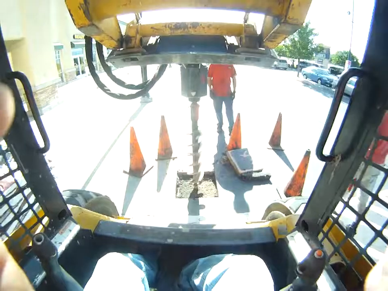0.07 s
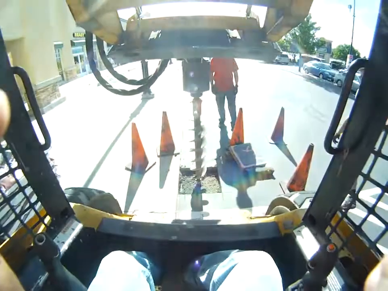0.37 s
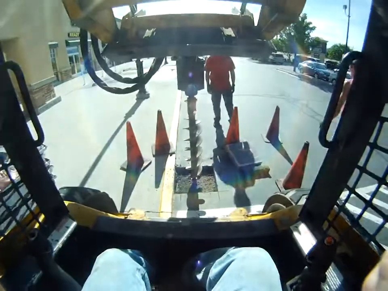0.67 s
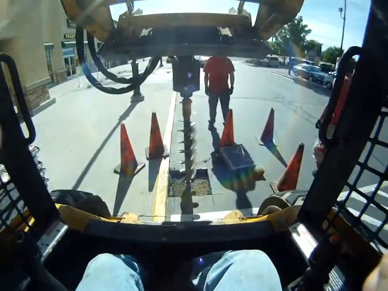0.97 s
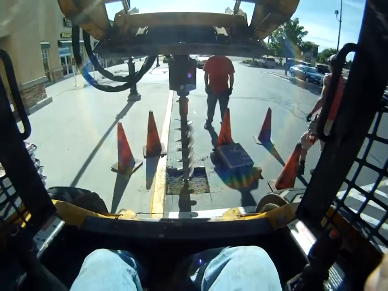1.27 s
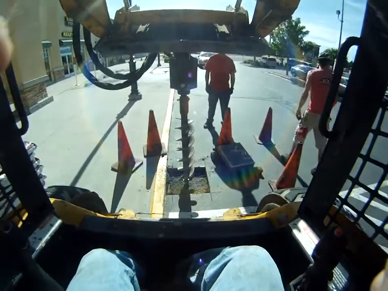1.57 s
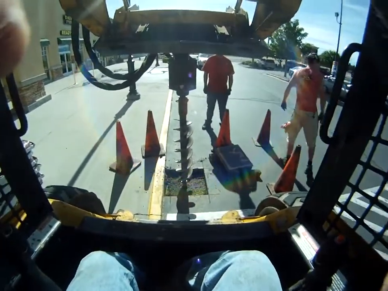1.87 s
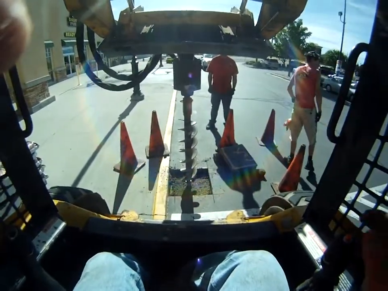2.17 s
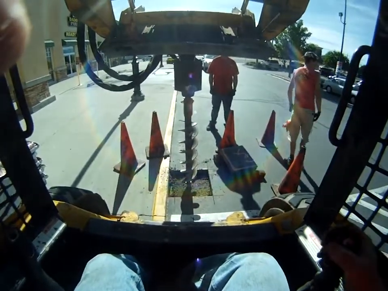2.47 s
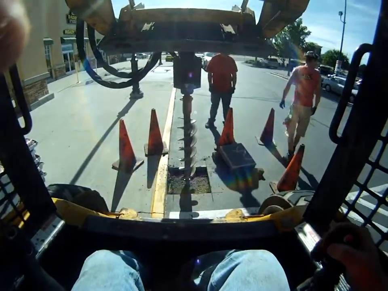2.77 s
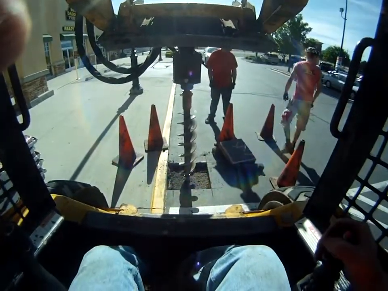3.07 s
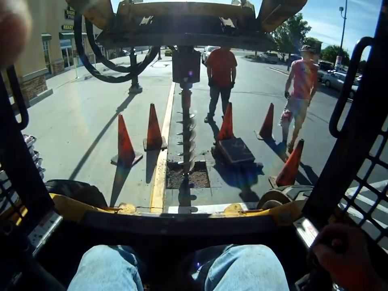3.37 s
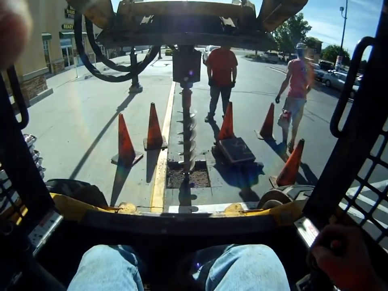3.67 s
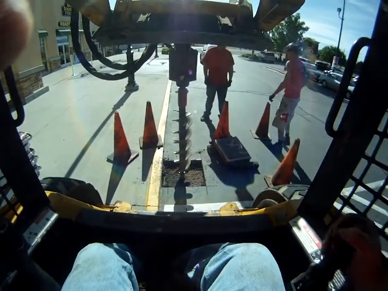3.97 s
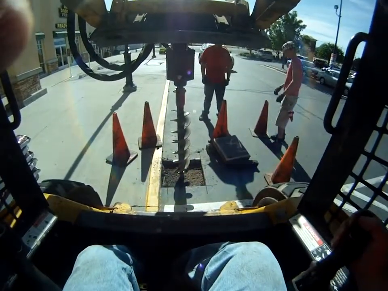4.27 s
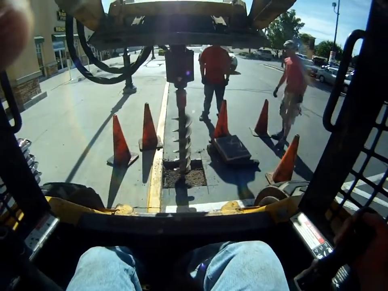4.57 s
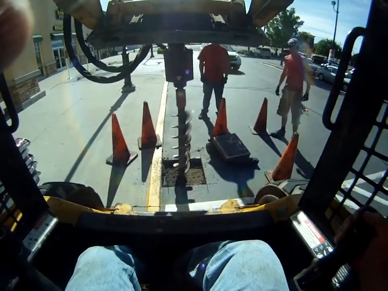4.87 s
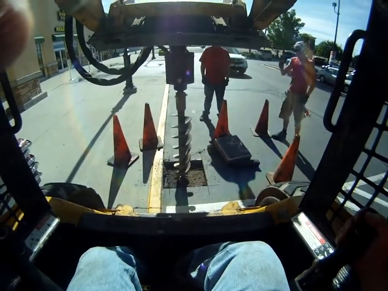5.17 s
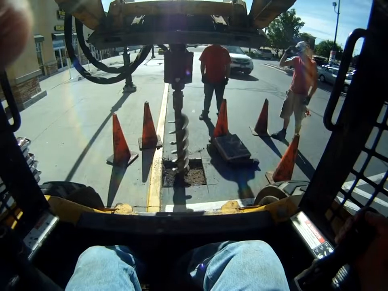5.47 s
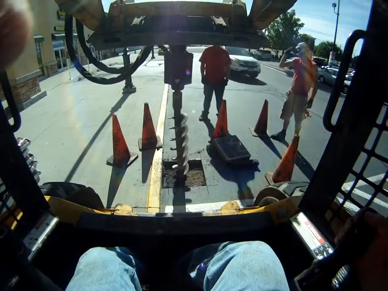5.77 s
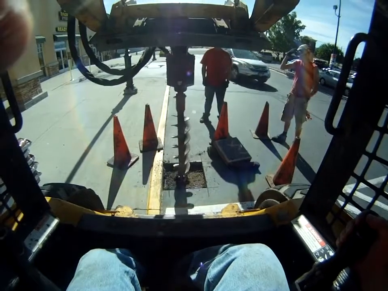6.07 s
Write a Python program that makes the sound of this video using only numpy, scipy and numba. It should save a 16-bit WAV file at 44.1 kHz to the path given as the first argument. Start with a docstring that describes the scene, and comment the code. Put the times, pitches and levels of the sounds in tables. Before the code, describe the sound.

A diesel skid steer idles with a steady throb and clatter, while fingers sharply knock and rub the microphone at first.

```python
"""Skid steer idling

A diesel idles, heard from the open cab on a small body-worn camera. Its firings throb, the pump whines,
the valves clatter and loose parts buzz and rattle. At first fingers hold, knock and rub the camera;
the hard knocks overload it, so it briefly turns itself down. Its coarse 12 kHz converter adds a thin fizz."""
import sys
import numpy as np
from scipy import signal
from scipy.fft import rfft, irfft, next_fast_len
from scipy.io import wavfile
from scipy.ndimage import uniform_filter1d
from numba import njit

SR = 44100
rng = np.random.default_rng(int(sys.argv[2]) if len(sys.argv) > 2 else 0)


def log_audio(samples):
    """Write samples as a 16-bit WAV file to the path given in sys.argv[1]."""
    # one column per channel
    frames = np.atleast_2d(samples).T
    # limit to full scale, then quantise
    limited = np.clip(frames, -1, 1)
    pcm = np.round(limited * 32767).astype(np.int16)
    wavfile.write(sys.argv[1], SR, pcm)


N = 279594
TIME = np.arange(N) / SR


def gain(db):
    """Turn decibels into a number to multiply by."""
    return 10 ** (np.asarray(db) / 20)


def normalise(x):
    """Scale a signal to an average (rms) size of one."""
    return x / np.sqrt(np.mean(x ** 2))


def wander(rate_hz):
    """A smooth random wobble, about one in size."""
    hold = max(int(SR / rate_hz), 2)
    steps = rng.standard_normal(2048)[(np.arange(N) // hold) % 2048]
    return normalise(uniform_filter1d(uniform_filter1d(steps, hold), hold))


def colour(x, curve, peaks=()):
    """Make some pitches stronger than others, as a solid body does; the result has size one."""
    size = next_fast_len(N)
    hz = np.arange(size // 2 + 1) * SR / size + 1
    curve = np.asarray(curve)
    db = np.interp(np.log(hz), np.log(curve[:, 0]), curve[:, 1])
    for centre, width, peak_db in peaks:
        db = db + peak_db / (1 + (2 * (hz - centre) / width) ** 2)
    return normalise(irfft(rfft(x, size) * gain(db), size)[:N])


def grains(per_second, spread_db):
    """Tiny impacts of uneven size at random moments."""
    hits = rng.random(N) < per_second / SR
    return normalise(hits * rng.standard_normal(N) * gain(spread_db * rng.standard_normal(N)))


def pulse(firings, decay, lead=.12):
    """Jump up just before each firing, then fade; decay and lead are shares of the gap between firings."""
    return normalise(np.exp(-((firings + lead) % 1) / decay))


def ramp(start_s, length_s):
    """A straight rise from zero to one."""
    return np.clip((TIME - start_s) / length_s, 0, 1)


def gesture(start_s, length_s, attack_s=0.009, release_s=0.015):
    """The strength of a hand movement: it builds up, holds, then dies away."""
    age = np.maximum(TIME - start_s, 0)
    return (1 - np.exp(-age / attack_s)) * np.exp(-np.maximum(age - length_s, 0) / release_s)


# the steady notes of engine and pump: (multiple of the firing rate, level [dB])
ENGINE_NOTES = [(1, -47), (2, -49.5), (3.25, -63.5), (4, -65), (4.75, -65.5), (6.5, -63.5), (8, -78),
                (9, -62), (13, -65), (18, -64.5)]

def throb_and_whine(firings, load, whine_multiple=19.5):
    """Engine and pump hum in step with the turning shaft; the whine grows as the pump works harder."""
    whine_db = -58 + 2.5 * load + 1.6 * wander(9)
    out = gain(whine_db) * np.sin(2 * np.pi * whine_multiple * firings)
    for multiple, db in ENGINE_NOTES:
        # the whole-number multiples line up into one pressure dip at each firing
        out -= gain(db + 0.3 * wander(4.6)) * np.cos(2 * np.pi * multiple * firings)
    return np.sqrt(2) * out


# the boom of exhaust and cab: (pitch [Hz], relative level [dB])
BOOM_COLOUR = [(15, 9.5), (35, 9.5), (70, 0.5), (110, 4.5), (160, 0), (240, -2), (330, -7.5), (500, -6.5),
               (700, -11.5), (1000, -24)]

def exhaust(firings, level_db=-49):
    """Each firing sends out a puff of gas that booms in the cab."""
    puffs = rng.standard_normal(N) * (1 + 0.24 * pulse(firings, decay=0.78))
    return gain(level_db) * colour(puffs, BOOM_COLOUR)


# the sound of the engine block and its covers: (pitch [Hz], relative level [dB])
BLOCK_COLOUR = [(400, -31), (750, -12), (920, -11), (1050, -5.5), (1300, -9.5), (1480, -4), (1950, -1),
                (2450, -5.5), (2750, -11.5), (3250, -18), (3750, -16.5), (4450, -26), (5050, -21.5),
                (6000, -30.5)]
# ringing panels: (pitch [Hz], width [Hz], boost [dB])
PANEL_RINGS = [(1030, 79, 5), (1171, 19, 6), (1229, 19, 7.5), (2100, 23, 6.5), (3016, 120, 7.5)]

def valve_clatter(firings, level_db=-44.5, ticks_per_cycle=64, ring_s=0.0025):
    """Valves and injectors tick in a repeating pattern, looser parts buzz at random, and panels ring."""
    pattern = (np.arange(ticks_per_cycle) + rng.random(ticks_per_cycle)) / ticks_per_cycle
    signs = rng.choice([-1, 1], ticks_per_cycle)
    cycles = np.arange(int(firings[-1] / 4) + 1)  # four firings make one engine cycle
    when = 4 * (cycles[:, None] + pattern).ravel()
    sizes = np.resize(signs, len(when)) * gain(2 * rng.standard_normal(len(when)))
    at = np.searchsorted(firings, when)
    ticks = np.zeros(N)
    np.add.at(ticks, at[at < N], sizes[at < N])
    # each tick spreads through the steel as a short burst
    t = TIME[:SR // 20]
    burst = rng.standard_normal(len(t)) * np.exp(-t / ring_s)
    ticks = normalise(signal.fftconvolve(ticks, burst)[:N])
    shaking = (ticks + rng.standard_normal(N)) * (1 + .5 * pulse(firings, decay=.35))
    ringing = colour(shaking, BLOCK_COLOUR, PANEL_RINGS)
    return ringing * gain(level_db + 0.27 * wander(6) + .5 * wander(60))


# the buzz of a loose steel cover: (pitch [Hz], relative level [dB])
COVER_COLOUR = [(1500, -34), (1950, -18), (2130, -7), (2255, 4), (2350, -2.5), (2490, -2.5), (2620, -20.5),
                (3000, -54)]

def loose_cover(firings, load, level_db=-46):
    """Each firing shakes a loose cover; its buzz wavers, and grows as the pump works harder."""
    taps = grains(per_second=6000, spread_db=1.5) * (1 + 0.13 * pulse(firings, decay=0.99))
    return colour(taps, COVER_COLOUR) * gain(level_db + 2.5 * load + 0.45 * wander(9))


# the rumble of a hand on the camera: (pitch [Hz], relative level [dB])
HAND_COLOUR = [(8, -17), (20, 8), (35, -2), (60, -9), (95, -20.5), (200, -23.5), (400, -47), (900, -75)]
# moments when the hand grips harder: (time [s], length [s], level [dB])
HAND_SQUEEZES = [(0.207, .08, -31), (0.475, 0.031, -38), (1.087, 0.024, -32)]
# a palm dragging over the microphone: (pitch [Hz], relative level [dB])
PALM_COLOUR = [(40, -2), (180, -5), (400, -9), (900, -23)]

def hand_grip(let_go_s=1.81, hold_db=-34, drag_s=0.056, drag_db=-33):
    """The holding hand rumbles, more when it squeezes, and drags over the microphone as it leaves."""
    pressure = 0
    for start_s, length_s, db in [(0, let_go_s, hold_db), *HAND_SQUEEZES]:
        pressure += gain(db) * gesture(start_s, length_s, attack_s=0.014, release_s=0.039)
    rumble = pressure * colour(rng.standard_normal(N), HAND_COLOUR)
    drag = gain(drag_db) * gesture(let_go_s - drag_s, drag_s)
    return rumble + drag * colour(rng.standard_normal(N), PALM_COLOUR)


# knocks on the camera:
# (time [s], ring level [dB], pitch [Hz], air note against the ring [dB], thump level [dB], thump length [s])
FINGER_KNOCKS = [(.1054, -8.5, 1520, -24, -17, 0.0032), (.1124, 22, 2224, -2.5, 10.5, 0.0033),
                 (.1351, -5.5, 2320, -6, -15, 0.0084), (0.18, -5.5, 2160, -6, -15, 0.0023),
                 (.191, 18, 1895, -16, 4, 0.0026), (0.7594, -1.5, 1990, -29, -26, 0.0022),
                 (0.7849, 18.5, 1777, -9, -10.5, 0.0023), (0.7981, -4.5, 1680, -8, -21, 0.0051),
                 (1.1094, -8.5, 1870, -30, -33, 0.0048), (1.2542, -16, 2040, -16, -53, .002),
                 (1.3886, -11, 1830, -16, -52, 0.0024), (1.7975, 21, 2110, -13.5, 20, 0.0063),
                 (1.8005, 22, 2210, -5, 13.5, 0.0017), (1.8115, -6, 1920, -2, -29, .006),
                 (1.8613, -21.5, 2300, -5, -28, .006)]
# the notes of the plastic case: (multiple of the knock's pitch, relative level [dB])
CASE_NOTES = [(.86, -11.5), (0.999, 1.5), (1.17, -6), (1.52, -11), (2.052, -19.5)]

def finger_knocks(air_hz=1020, ring_s=0.0086, crack_db=-13, crack_s=0.0015, contact_s=0.00027):
    """A knock cracks, rings the plastic case and the air inside, and thumps the microphone."""
    out = np.zeros(N)
    t = TIME[:SR // 10]
    onset = 1 - np.exp(-t / contact_s)
    fade = np.exp(-np.log(1000) * t / ring_s)  # 60 dB quieter after ring_s
    for time_s, db, hz, air_db, thump_db, thump_s in FINGER_KNOCKS:
        case = sum(gain(note_db) * np.sin(2 * np.pi * hz * ratio * t) for ratio, note_db in CASE_NOTES)
        air = gain(air_db) * np.sin(2 * np.pi * air_hz * t)
        ring = (case + air) * fade
        crack = gain(crack_db) * rng.standard_normal(len(t)) * np.exp(-t / crack_s)
        thump = np.sin(np.pi * np.minimum(t / thump_s, 1)) ** 2
        start = int(time_s * SR)
        out[start:start + len(t)] += gain(db) * onset * (ring + crack) + gain(thump_db) * thump
    return out


# fingers sliding on the case: (time [s], length [s], level [dB], share of dull scrape [0-1])
FINGER_RUBS = [(0.111, 0.0089, -26, .2), (0.727, 0.043, -37.5, 0.16), (1.06, 0.063, -44, 0.05),
               (1.237, 0.029, -28.5, 0.07), (1.328, 0.088, -42, 0), (1.427, 0.055, -33, 0),
               (1.5, 0.073, -30, 0.02), (1.652, 0.083, -36, 0.5), (1.765, 0.027, -30.5, .25)]
# the bright rub of a fingertip: (pitch [Hz], relative level [dB])
FINGERTIP_COLOUR = [(120, -44), (200, -4), (562, -7), (746, -9), (885, -4), (1330, 3), (1490, 10.5),
                    (2280, 8), (2630, 0.5), (2950, -1), (3350, -9.5), (3650, -13.5), (5900, -2),
                    (7670, -55), (13000, -120)]
# where the rubbed case rings: (pitch [Hz], width [Hz], boost [dB])
CASE_RINGS = [(1530, 120, 0), (2280, 140, 8.5), (2930, 140, 7.5), (3606, 420, 17.5), (4400, 240, 4)]
# the dull scrape of a flat finger: (pitch [Hz], relative level [dB])
FLAT_FINGER_COLOUR = [(100, -16), (300, -17), (520, -23), (780, 3.5), (1050, -2), (1450, 4), (2000, -3),
                      (4000, -37)]

def finger_rubs(judder_db=1.5):
    """Skin catches and slips on the case: bright under a fingertip, duller under a flat finger."""
    slips = colour(grains(per_second=13000, spread_db=0.5), FINGERTIP_COLOUR, CASE_RINGS)
    scrape = colour(grains(per_second=2700, spread_db=2), FLAT_FINGER_COLOUR)
    out = np.zeros(N)
    for start_s, length_s, db, dull in FINGER_RUBS:
        blend = np.sqrt(1 - dull) * slips + np.sqrt(dull) * scrape
        out += gain(db) * gesture(start_s, length_s) * blend
    return out * gain(judder_db * wander(150))


# loose fittings in the cab: (time [s], pitch [Hz], level [dB], fade time [s])
FITTING_RATTLES = [(5.315, 1600, -39, 0.015), (5.32, 2430, -36, 0.023), (5.788, 1090, -29.5, 0.0069),
                   (5.932, 2320, -27.5, 0.0046)]

def cab_rattles(wobble_hz=55, rise_s=0.0022):
    """Now and then a loose fitting is shaken and rings for a moment."""
    out = np.zeros(N)
    for time_s, hz, db, fade_s in FITTING_RATTLES:
        age = np.maximum(TIME - time_s, 0)
        loudness = gain(db) * (1 - np.exp(-age / rise_s)) * np.exp(-age / fade_s)
        pitch_hz = hz + wobble_hz * wander(250)
        out += loudness * np.sin(2 * np.pi * np.cumsum(pitch_hz) / SR)
    return np.sqrt(2) * out


def scene(idle_hz=31.65, sag_hz=.26, unsteadiness=0.001011, first_firing_s=.012):
    """The engine slows a little once the pump is working; one microphone feeds both channels."""
    load = ramp(start_s=2.27, length_s=1.6)  # how hard the pump works
    firing_hz = idle_hz - sag_hz * ramp(start_s=4.2, length_s=.5)
    firing_hz *= 1 + unsteadiness * wander(10)
    firings = np.cumsum(firing_hz) / SR - idle_hz * first_firing_s  # a running count of firings
    machine = throb_and_whine(firings, load) + exhaust(firings) + valve_clatter(firings)
    machine += loose_cover(firings, load) + cab_rattles()
    mono = machine + finger_knocks() + finger_rubs() + hand_grip()
    return np.array([mono, mono])


@njit
def follow_level(x, attack_s, release_s):
    """Track how loud a signal is, rising over attack_s and falling over release_s."""
    out, level = np.empty(len(x)), 0.
    for i in range(len(x)):
        lag_s = attack_s if abs(x[i]) > level else release_s
        level += (abs(x[i]) - level) / (lag_s * SR)
        out[i] = level
    return out


def record(dry, limit_db=-6, clip_db=1.0, bass_hz=45, treble_hz=5500, converter_hz=12000, top_hz=15300):
    """The camera switches on, turns down after overloads, clips peaks and holds each sample as a step."""
    x = dry[0] * ramp(start_s=.104, length_s=.001)
    level = follow_level(x, attack_s=0.0045, release_s=0.057)
    x = x / np.maximum(1, level / gain(limit_db))
    x = np.clip(x, -gain(clip_db), gain(clip_db))
    # a capacitor blocks the deepest bass, so a clipped thump sags and swings back
    x = signal.sosfilt(signal.butter(1, bass_hz, "high", fs=SR, output="sos"), x)
    x = signal.sosfilt(signal.butter(10, treble_hz, fs=SR, output="sos"), x)
    coarse = np.clip(signal.resample_poly(x, converter_hz, SR), -.95, .95)
    # the steps mirror the sound around the converter's rate: this is the fizz
    steps = signal.resample_poly(np.repeat(coarse, 8), SR, 8 * converter_hz)[:N]
    out = signal.sosfilt(signal.ellip(10, .2, 70, top_hz, fs=SR, output="sos"), steps)
    return np.array([out, out])


dry = scene()
out = record(dry)
log_audio(out)
```